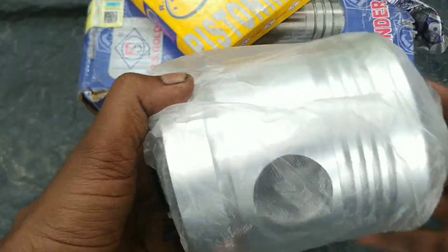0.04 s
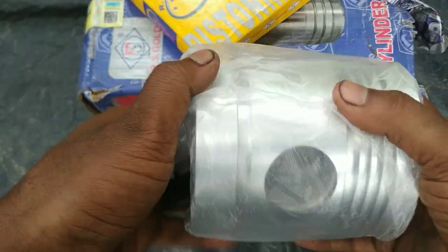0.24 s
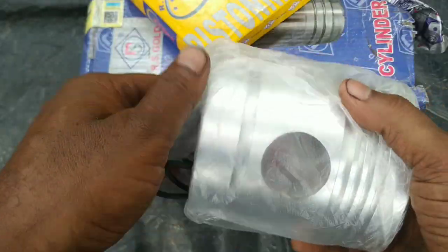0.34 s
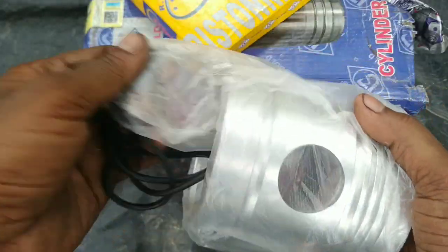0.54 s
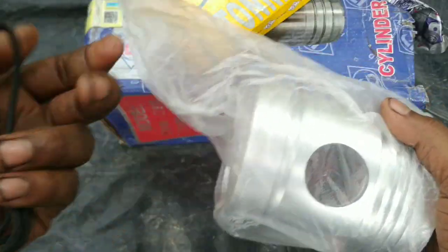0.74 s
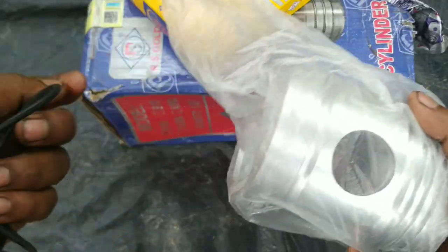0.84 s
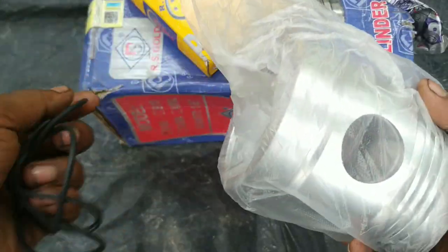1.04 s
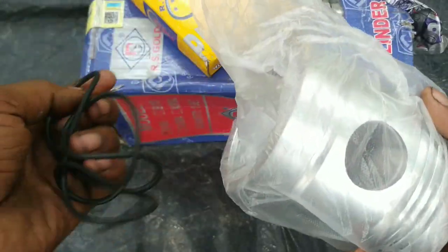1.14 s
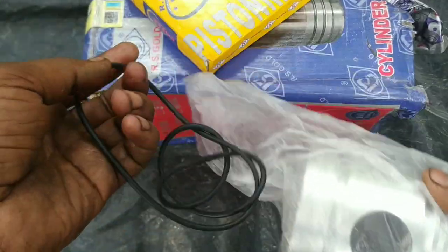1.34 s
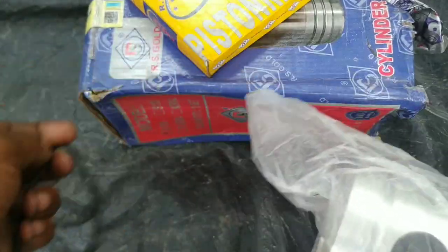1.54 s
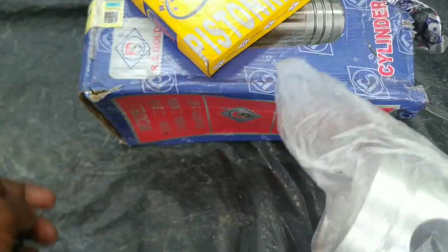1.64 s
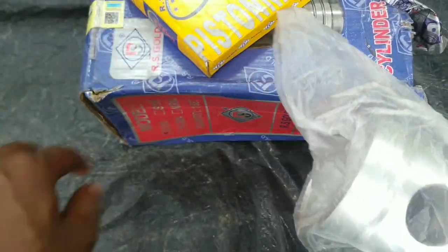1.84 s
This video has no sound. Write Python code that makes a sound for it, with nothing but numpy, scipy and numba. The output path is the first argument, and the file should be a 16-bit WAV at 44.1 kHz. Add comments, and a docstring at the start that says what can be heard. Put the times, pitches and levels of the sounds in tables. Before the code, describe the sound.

A thin plastic bag crinkles very close in stereo, in a small dry room. Faint rustles and ticks open; from 0.2 seconds a dense, bright crackle grows, with sharp snaps and slight hollow resonance, strongest around 0.5-0.75, fading by 0.95. Lighter snaps and rustles follow at 1.0-1.2, a busier cluster at 1.3-1.55, near quiet, then small crinkles from 1.7. Soft rumble, hiss and faint high whine lie beneath.

```python
"""Indoors, close to two microphones, a hand pulls a thin plastic bag off a hollow metal part.
The film buckles in thousands of tiny clicks, each ringing in resonances that stand for patches of film.
The same clicks excite the air in the hollow, which booms near 1 kHz during the long pull.
Before, during and after the pull creases snap; the loose film rustles mostly before and after it.
Shaped noise gives the low rumble and faint hiss; noise in narrow resonances gives a thin high whine."""
import sys
import numpy as np
from scipy import signal
from scipy.fft import rfft, irfft, next_fast_len
from scipy.io import wavfile
from scipy.ndimage import map_coordinates
from numba import njit

SR = 44100
rng = np.random.default_rng(int(sys.argv[2]) if len(sys.argv) > 2 else 0)


def persist_wave(psi):
    """Save psi, clipped to +-1, as 16-bit WAV."""
    counts = np.round(np.clip(psi, -1, 1) * 32767).astype(np.int16)
    wavfile.write(sys.argv[1], SR, np.atleast_2d(counts).T)


def voltage_ratio(decibels):
    """Convert decibels (scalar or array-like) to amplitude ratios, 20 dB per decade."""
    exponent = np.asarray(decibels, float) / 20
    return 10 ** exponent


N = 83790   # samples

# The long pull. Each row: time in seconds, crackle level in dB, hollow level in dB relative to the crackle,
# tilt in dB per octave, extra level in dB of the large slack folds below FOLD_HZ.
PULL = [(0.159, -62, -4, -1, -1), (0.194, -41.5, -9, -1.5, 6), (0.212, -42, -9, -2, 11),
        (0.234, -34, -28, 0.5, -4.5), (0.262, -38, -5.5, 1.5, 2), (0.278, -39.5, -19.5, 1.5, 5),
        (0.334, -37, -8, 0.5, 0), (0.507, -31.5, -18, 1, -2.5), (0.515, -27.5, -22.5, 1, -3.5),
        (0.585, -28, -19.5, 1, -2), (0.65, -25.5, -12.5, 1, 2.5), (0.697, -29, -16, 2, 2.5),
        (0.746, -27, -24.5, 2, -0.5), (0.758, -34, -6, 1, -1), (0.779, -35.5, -23.5, 2.5, 0.5),
        (0.96, -59, -1.5, -3, 2), (1.0, -74, -37, 1, 3)]
# Rustles of the loose film, swelling or sagging until the hand stops. Each row: start in seconds,
# length in seconds, level at the start in dB, level at the end in dB, tilt in dB per octave.
RUSTLES = [(0.0, 0.011, -53.5, -51, -3), (0.028, 0.12, -59, -59, -6.5), (0.043, 0.032, -58.5, -61, -1.5),
           (0.115, 0.022, -52, -48.5, 0.5), (0.186, 0.041, -43.5, -57, 3.5), (0.992, 0.028, -55, -55, 1),
           (1.048, 0.072, -60.5, -60.5, 2.5), (1.103, 0.0084, -56, -54, 4), (1.115, 0.033, -44, -50, 3.5),
           (1.149, 0.13, -67, -66.5, -2), (1.21, 0.043, -53.5, -56, 1), (1.302, 0.063, -58.5, -50, -1),
           (1.358, 0.038, -43.5, -43, 0), (1.401, 0.024, -43.5, -40.5, 0),
           (1.445, 0.032, -51.5, -45.5, -2.5), (1.492, 0.033, -42.5, -43.5, -2),
           (1.53, 0.053, -62, -76.5, 16), (1.647, 0.0069, -80, -86, -5), (1.68, 0.037, -76, -69.5, -2),
           (1.717, 0.042, -55, -57.5, -3), (1.772, 0.066, -63, -50.5, -3.5), (1.8, .008, -57, -66, 0),
           (1.818, 0.013, -61, -53, -0.5), (1.833, .08, -46.5, -48, 1.5)]
# Single creases snapping. Each row: start in seconds, peak level in dB, tilt in dB per octave.
SNAPS = [(0.0084, -43, 0), (0.076, -35, 4), (0.1009, -32.5, -0.5), (0.2276, -40, -2), (0.3683, -21, 2),
         (0.476, -25, -1.5), (0.4982, -28, 8), (0.5497, -19, 2), (0.6291, -17.5, -1), (0.7454, -37, 8),
         (0.7695, -22, 0), (0.8605, -49, 6), (1.0047, -35.5, 1.5), (1.016, -37.5, 8), (1.0568, -33.5, 2.5),
         (1.1181, -29, 3), (1.129, -31, -1.5), (1.1365, -32, -3.5), (1.1455, -36.5, 4), (1.2085, -42, 1),
         (1.216, -46, 1), (1.233, -46, 3), (1.285, -49.5, 9), (1.3036, -46, -2), (1.3613, -38, -5),
         (1.3713, -23.5, 1.5), (1.4065, -38, -2), (1.4193, -28.5, 3), (1.45, -34, -1), (1.461, -30, 6),
         (1.464, -25.5, 0.5), (1.4915, -35, 0), (1.5083, -31, 6), (1.5186, -30.5, -5.5),
         (1.5258, -27.5, 2.5), (1.5952, -51, 13.5), (1.685, -55, -4), (1.7222, -38, -1),
         (1.8043, -31, -0.5), (1.8335, -31.5, 8), (1.8398, -31, -2), (1.852, -32, -0.5), (1.8772, -35.5, 3)]
# Colour of the crackle. Each row: frequency in Hz, gain in dB.
FILM_COLOUR = [(150, -8), (400, -14.5), (800, -10), (1250, -12), (1700, -6), (2600, -10), (4200, -6.5),
               (5740, -2.5), (8000, -8), (9700, -13), (12500, -19.5), (14000, -18), (15500, -11.5)]
# Where the bag is. Each row: time in seconds, lateness of the left microphone in ms, left minus right in dB.
BAG_PLACE = [(0, 0.084, 1), (.35, 0.03, 4), (0.599, 0.12, 0.5), (0.851, 0.14, 0.5), (1.069, -0.00052, 2),
             (1.298, -0.084, 0.3), (1.548, -0.011, 0), (1.8, 0.13, 0.5)]
# Reflections off metal, hand and box. Each row: mean delay in ms, level in dB.
BOUNCES = [(1.3, -5), (2.3, -6.5), (3.7, -8.5)]
# High resonances of crackle and whine. Each row: centre in Hz, width of each of two passes in Hz, gain in dB.
HIGH_LINES = [(9150, 350, 0), (9550, 500, -2), (9900, 400, 0), (10600, 1200, -7)]
# High ringing added to the crackle. Each row: time in seconds, gain in dB.
HIGH_RING_GAIN = [(0, -5), (.2, 2), (.4, -18), (.62, -9), (.8, -6.5), (1.0, 8), (1.2, 6), (1.4, -8),
                  (1.55, 13.5), (1.72, 6), (1.84, 11), (1.9, 12.5)]
# Pitch of the air in the hollow part. Each row: time in seconds, frequency in Hz.
HOLLOW_PITCH = [(0.16, 920), (0.3, 896), (0.42, 977), (0.5, 993), (0.65, 990), (0.8, 977), (1.0, 992)]
# Rumble and handling. Each row: time in seconds, level in dB.
RUMBLE_LEVEL = [(0.0, -61), (0.184, -59), (0.21, -47.5), (0.274, -59), (0.496, -59.5), (0.64, -51),
                (0.746, -51.5), (0.804, -60.5), (1.122, -57.5), (1.164, -69.5), (1.21, -54), (1.264, -62.5),
                (1.428, -63), (1.444, -59), (1.656, -67), (1.9, -58)]
# Colour of the rumble. Each row: frequency in Hz, density in dB per Hz.
RUMBLE_COLOUR = [(12, -57), (20, -5), (91, 2.5), (173, -5), (222, -14.5), (258, -11), (327, -14),
                 (400, -10.5), (520, -79), (880, -120)]
# Colour of the hiss. Each row: frequency in Hz, density in dB per Hz.
HISS_COLOUR = [(150, -34), (250, -3), (500, -6.5), (900, -12.5), (5000, -18), (7000, -22), (11000, -21),
               (13000, -26), (15800, -21)]
# Likeness of rumble and hiss in the two channels. Each row: frequency in Hz, correlation from 0 to 1.
LIKENESS = [(60, 0.96), (380, 0.51), (2380, 0.027), (15000, 0.0097)]
# The high whine. Each row: time in seconds, level in dB.
WHINE_LEVEL = [(0.0, -67.5), (0.9, -62), (1.18, -71.5), (1.4, -65), (1.6, -77), (1.9, -71)]

RUSTLE_RISE_DB_PER_S, RUSTLE_RELEASE_DB_PER_S = 2500, 1500
RUSTLE_HOLLOW_DB = -16.5   # relative to the rustle
SNAP_PEAK_AFTER_S, SNAP_RISE_S, SNAP_FALL_S = 0.0015, 0.0009, 0.0009
SNAP_TRIM_DB = -6.5   # rms of a snap relative to its peak
SNAP_CLICK_DB = 7   # height of the one main click in a snap
CLICKS_PER_S = 10000
CLICK_CYCLES = 9.16   # cycles in which a ring falls by 60 dB
CLICK_SPREAD_DB = 2
CLUMP_DB, CLUMP_HZ = 0.8, 90   # clicks come in clumps
LAG_SPREAD_S, SIDE_SPREAD_DB = 0.00007, 2.5
PATCH_DB, PATCH_HZ = 2.5, 4.7   # each patch of film flares on its own
FOLD_HZ = 800
BOUNCE_ABOVE_HZ = 1730   # small surfaces throw back only short waves
BOUNCE_SWAY, BOUNCE_SWAY_HZ = 0.0778, 1.613   # sway as a share of the delay, and its rate
HOLLOW_WIDTH_HZ = 169   # of the narrower of two passes
HOLLOW_FLUTTER_DB, HOLLOW_FLUTTER_HZ = 2, 40   # the film flaps over the opening
ROOM_T60_S, ROOM_DB, WALL_CUT_HZ = 0.06, -7, 22000
ROOM_ALIKE_BELOW_HZ = 1300   # long waves reach both microphones alike
HISS_DB = -74.5
WHINE_FLICKER_DB, WHINE_FLICKER_HZ = 1, 20
TOP_CUT_HZ = 15500   # upper edge of the passband

TIME = np.arange(N) / SR   # seconds


def over_time(points):
    """Linear interpolation of a (seconds, value) table at every sample."""
    return np.interp(TIME, *np.transpose(points))


def rms_one(x):
    """Normalisation to unit mean power."""
    return x / np.sqrt(np.mean(x ** 2) + 1e-20)


def at_hz(points, hz):
    """Interpolation of a spectrum on a logarithmic frequency axis."""
    table_hz, db = np.transpose(points)
    return np.interp(np.log(hz), np.log(np.maximum(table_hz, 1)), db)


def drift(rate_hz):
    """A slow random process: white noise through two equal low-pass poles, with spread 1."""
    r = np.exp(-16 * np.pi * rate_hz / SR)   # computed at every eighth sample
    slow = signal.lfilter([1], [1, -2 * r, r * r], rng.standard_normal(N // 8 + 2002))[2000:]
    return np.interp(np.arange(N) / 8, np.arange(len(slow)), rms_one(slow))


def resonate(x, hz, width_hz):
    """Two-pole resonance with zeros at both ends of the spectrum and gain 1 at its peak."""
    r = np.exp(-np.pi * width_hz / SR)
    zeros = np.array([1, 0, -1]) * (1 - r * r) / 2
    poles = [1, -2 * r * np.cos(2 * np.pi * hz / SR), r * r]
    return signal.lfilter(zeros, poles, x + 1e-18)


def coloured_noise(spectrum):
    """Spectral shaping of stereo noise: mid and side parts set the correlation of the channels; rms 1."""
    hz = np.maximum(np.fft.rfftfreq(N, 1 / SR), 1)
    mid, side = rfft(rng.standard_normal((2, N))) * voltage_ratio(at_hz(spectrum, hz))
    alike = np.clip(at_hz(LIKENESS, hz), -1, 1)
    opposite = np.array([[1], [-1]])
    return rms_one(irfft(np.sqrt(1 + alike) * mid + np.sqrt(1 - alike) * side * opposite, N))


def rustles():
    """Loose film in brief motion: powers of crackle and hollow, then power-weighted tilt and fold dB."""
    total = np.zeros((4, N))
    for start, length, first_db, last_db, tilt in RUSTLES:
        end = start + length
        rise_db = RUSTLE_RISE_DB_PER_S * np.maximum(start - TIME, 0)
        release_db = RUSTLE_RELEASE_DB_PER_S * np.maximum(TIME - end, 0)
        level_db = np.interp(TIME, [start, end], [first_db, last_db])
        power = voltage_ratio(2 * (level_db - rise_db - release_db))
        total += [power, power * voltage_ratio(2 * RUSTLE_HOLLOW_DB), power * tilt, 0 * power]
    return total


def snaps():
    """Sudden release of a crease: exponential rise and fall, in the same four quantities as rustles()."""
    total = np.zeros((4, N))
    for start, db, tilt in SNAPS:
        age = TIME - start - SNAP_PEAK_AFTER_S
        shape = np.exp(-np.maximum(age / SNAP_FALL_S, -age / SNAP_RISE_S))
        power = (voltage_ratio(db + SNAP_TRIM_DB) * shape) ** 2
        total += [power, 0 * power, power * tilt, 0 * power]
    return total


def pull():
    """Sustained drag of the film over the part, in the same four quantities as rustles()."""
    s, db, hollow_db, tilt, fold_db = np.transpose(PULL)
    power = voltage_ratio(2 * np.interp(TIME, s, db, left=-120, right=-120))
    hollow = power * voltage_ratio(2 * np.interp(TIME, s, hollow_db))
    return np.array([power, hollow, power * np.interp(TIME, s, tilt), power * np.interp(TIME, s, fold_db)])


def handling():
    """Addition of powers: crackle and hollow amplitudes, with power-weighted means of tilt and fold dB."""
    power, hollow, tilt_sum, fold_sum = rustles() + snaps() + pull()
    return np.sqrt(power), np.sqrt(hollow), tilt_sum / power, fold_sum / power


def snapped():
    """Impulse instants: true at the peak of each snap."""
    peaks_s = np.array(SNAPS)[:, 0] + SNAP_PEAK_AFTER_S
    return np.isin(np.arange(N), (peaks_s * SR).astype(int))


def clicks():
    """Buckling as random impulses; each reaches the two microphones with its own lag and balance."""
    chance, size, sign = rng.random(N), rng.exponential(1, N), rng.choice([-1, 1], N)
    lag, side = rng.standard_normal((2, N))
    height_db = CLICK_SPREAD_DB * np.minimum(size, 5) + CLUMP_DB * drift(CLUMP_HZ)
    height = (chance < CLICKS_PER_S / SR) * sign * voltage_ratio(height_db)
    main = snapped()
    height[main] = voltage_ratio(SNAP_CLICK_DB) * sign[main]
    s, late_ms, left_db = np.transpose(BAG_PLACE)
    lag_s = np.interp(TIME, s, late_ms) / 1000 + LAG_SPREAD_S * lag
    balance = voltage_ratio((SIDE_SPREAD_DB * side + np.interp(TIME, s, left_db)) / 2)
    late = np.clip(np.arange(N) + np.round(lag_s * SR).astype(int), 0, N - 1)
    return height * balance, late, height / balance


def heard(left, late, right, weight):
    """Difference of arrival: weighted clicks, the left ones moved to their own sample."""
    return np.array([np.bincount(late, left * weight, N), right * weight])


def bounced(x):
    """Comb interference: close reflections whose paths sway as the bag moves, carving gliding notches."""
    out, n = x.copy(), np.arange(N)
    high_pass = signal.butter(2, BOUNCE_ABOVE_HZ, "high", fs=SR, output="sos")
    short_waves = signal.sosfilt(high_pass, x)
    for ms, db in BOUNCES:
        for c in range(2):
            delay = ms / 1000 * SR * (1 + BOUNCE_SWAY * drift(BOUNCE_SWAY_HZ))   # samples
            out[c] += voltage_ratio(db) * map_coordinates(short_waves[c], [n - delay], order=3)
    return out / np.sqrt(1 + sum(voltage_ratio(2 * db) for ms, db in BOUNCES))


def high_lines(x):
    """Resonances in cascade: two passes through each of a few narrow high lines."""
    return sum(voltage_ratio(db) * resonate(resonate(x, hz, width), hz, width) for hz, width, db in HIGH_LINES)


def crackle(train, level, tilt, fold_db):
    """Impulse response of the film: clicks ring in patches of all sizes, small ones at high pitches."""
    main = snapped()
    dealt = rng.integers(0, 5, N)   # a click excites every fifth patch; a main click all above the folds
    steady, out = 0, 0
    for k, hz in enumerate(np.geomspace(180, 15500, 22)):
        struck = (dealt == k % 5) | main & (hz > FOLD_HZ)
        mine = struck * voltage_ratio(at_hz(FILM_COLOUR, hz) + PATCH_DB * drift(PATCH_HZ))
        width = 2.2 * hz / CLICK_CYCLES
        steady = steady + resonate(train[2] * mine, hz, width)
        tilt_db = np.clip(tilt, -8, 8) * np.log2(max(hz, 1500) / 6000)
        weight = mine * level * voltage_ratio(tilt_db + fold_db * (hz < FOLD_HZ))
        # neighbouring patches have opposite signs
        out = out + (-1) ** k * resonate(heard(*train, weight), hz, width)
    film = bounced(out) / np.std(steady)   # scaled by the ring of clicks at constant level
    return film + voltage_ratio(over_time(HIGH_RING_GAIN)) * high_lines(film)


@njit
def glide(x, turn, r):
    """Two-pole resonance whose centre moves sample by sample."""
    y = np.zeros_like(x)
    for i in range(2, len(x)):
        y[i] = (x[i] - x[i - 2]) * (1 - r * r) / 2 + 2 * r * turn[i] * y[i - 1] - r * r * y[i - 2]
    return y


def hollow_air(x):
    """Cavity resonance: the air in the part rings at a pitch that follows the opening."""
    turn = np.cos(2 * np.pi * over_time(HOLLOW_PITCH) / SR)
    r = np.exp(-np.pi * HOLLOW_WIDTH_HZ / SR)
    return np.array([glide(glide(c + 1e-18, turn, r * r), turn, r) for c in x])


def hollow_boom(train, hollow):
    """Excitation of the cavity by the clicks, modulated as the film flaps over the opening."""
    weight = hollow * voltage_ratio(HOLLOW_FLUTTER_DB * drift(HOLLOW_FLUTTER_HZ))
    return hollow_air(heard(*train, weight)) / np.std(hollow_air([train[2]]))


def bag():
    """Common excitation: one train of clicks drives both the film and the hollow of the part."""
    level, hollow, tilt, fold_db = handling()
    train = clicks()
    return crackle(train, level, tilt, fold_db) + hollow_boom(train, hollow)


def room(x):
    """Reverberation: eight feedback delays a side, duller on every round."""
    size = next_fast_len(N + SR // 2)
    w = 2 * np.pi * np.fft.rfftfreq(size, 1 / SR)
    lags = rng.uniform(0.008, 0.03, (2, 8, 1))   # seconds
    wall = 1 / (1 + 1j * w / (2 * np.pi * WALL_CUT_HZ))
    loop = voltage_ratio(-60 * lags / ROOM_T60_S) * np.exp(-1j * w * lags) * wall
    paths = (loop / (1 - loop)).sum(axis=1)
    apart = 1 - 1 / (1 + (w / (2 * np.pi * ROOM_ALIKE_BELOW_HZ)) ** 2)
    response = paths[0] + apart * (paths - paths[0])
    return irfft(response * rfft(x.mean(axis=0), size), size)[:, :N]


def rumble():
    """Low-frequency noise of room and handling, with a level that varies in time."""
    return voltage_ratio(over_time(RUMBLE_LEVEL)) * coloured_noise(RUMBLE_COLOUR)


def hiss():
    """Stationary broadband noise at a constant level."""
    return voltage_ratio(HISS_DB) * coloured_noise(HISS_COLOUR)


def whine():
    """Narrow-band noise: flickering noise in the high resonances, unrelated in the two channels."""
    level_db = over_time(WHINE_LEVEL) + WHINE_FLICKER_DB * drift(WHINE_FLICKER_HZ)
    return voltage_ratio(level_db) * rms_one(high_lines(rng.standard_normal((2, N))))


def scene():
    """Superposition of the bag, its room, the rumble, the hiss and the whine."""
    near = bag()
    return near + voltage_ratio(ROOM_DB) * room(near) + rumble() + hiss() + whine()


def roll_off(x):
    """The treble ends steeply here."""
    return signal.sosfilt(signal.butter(12, 16190, fs=SR, output="sos"), x)


def record(dry):
    """Band limitation: a steep elliptic low-pass cuts the top of the spectrum."""
    top_cut = signal.ellip(12, 0.5, 65, TOP_CUT_HZ, fs=SR, output="sos")
    mix = signal.sosfilt(top_cut, dry)
    return roll_off(mix)


dry = scene()
out = record(dry)
persist_wave(out)
```